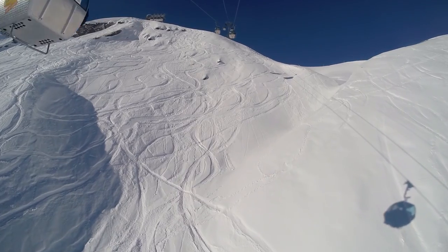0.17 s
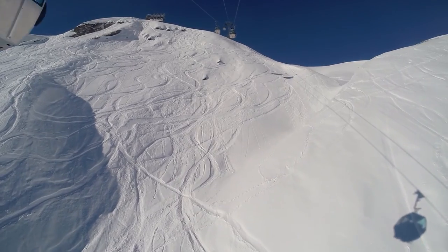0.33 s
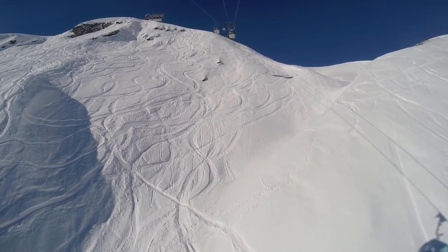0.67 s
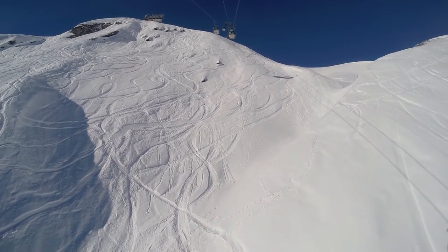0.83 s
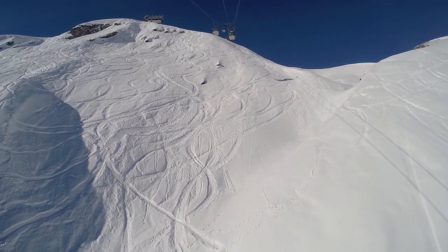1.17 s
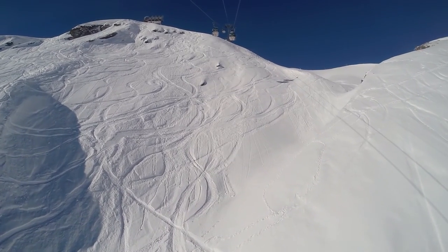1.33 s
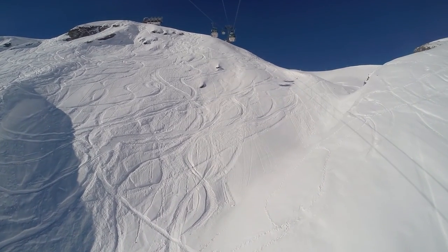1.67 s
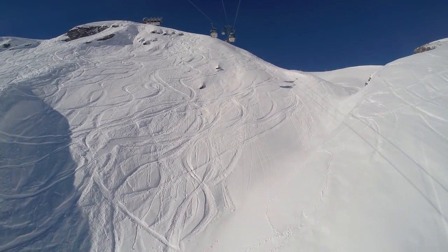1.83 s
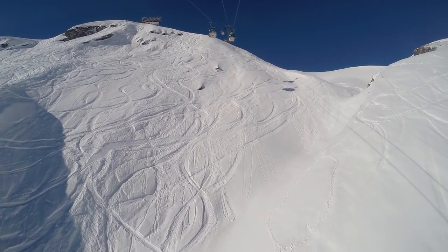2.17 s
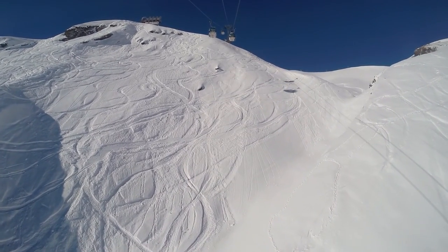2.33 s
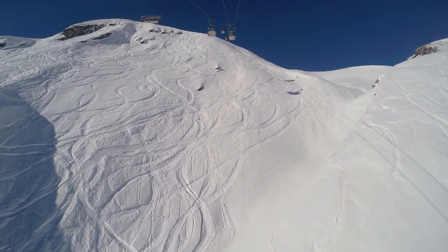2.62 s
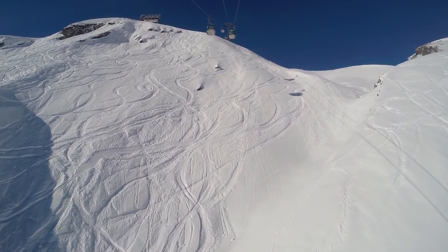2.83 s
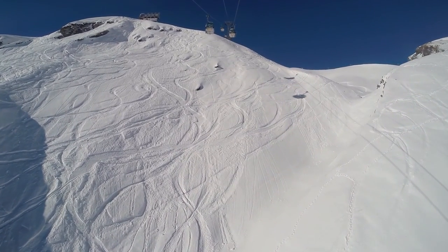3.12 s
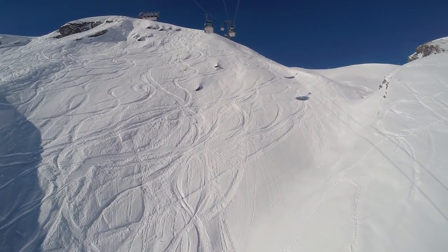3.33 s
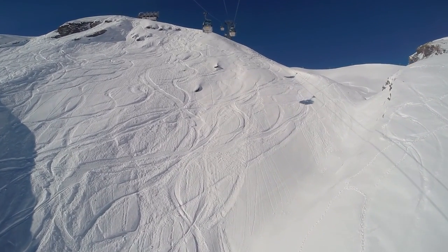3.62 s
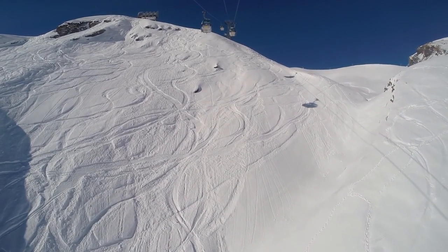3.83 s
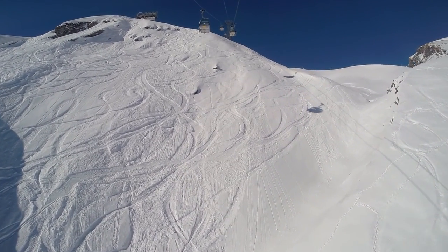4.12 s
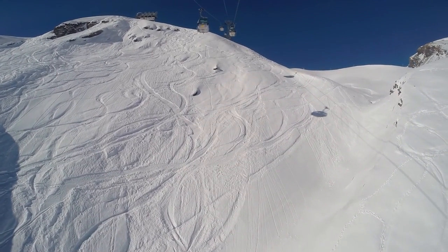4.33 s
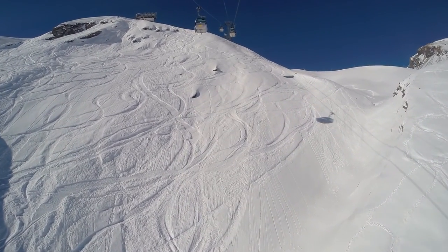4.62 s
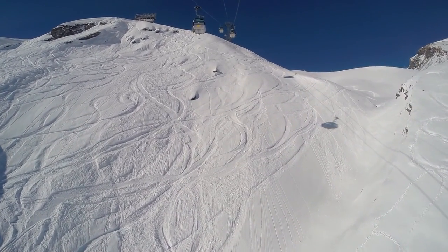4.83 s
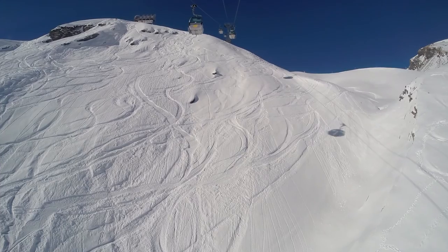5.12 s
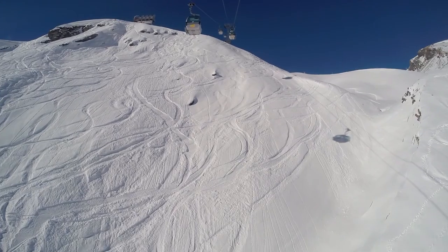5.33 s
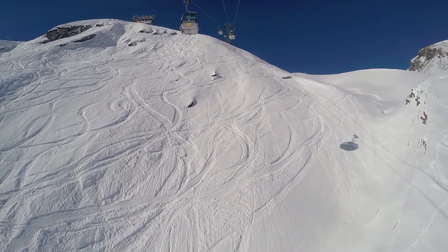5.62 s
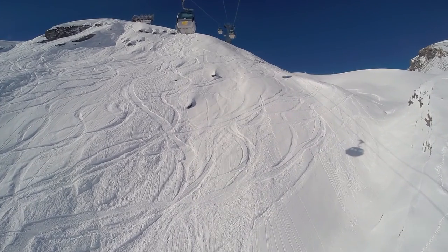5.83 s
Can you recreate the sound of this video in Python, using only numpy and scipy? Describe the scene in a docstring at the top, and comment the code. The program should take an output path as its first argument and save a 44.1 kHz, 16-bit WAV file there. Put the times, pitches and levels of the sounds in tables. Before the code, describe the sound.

A cable car cabin hums under fading wind rumble, with close jacket rustles, camera handling and a few sharp metal clicks.

```python
"""A low hum and a rumble of wind fill a cable car cabin riding uphill. The rope's twisted strands run over
the sheaves and set the shell humming; the wind gusts round the cabin and dies down. Close by, jacket cloth
rustles and fingers rub, bump and tick on a camera case. A few plastic taps and four sharp clicks of metal
gear cut through, and a faint electronic whine stays throughout."""
import sys
import numpy as np
from scipy.fft import rfft, irfft, next_fast_len
from scipy.io import wavfile
from scipy.ndimage import uniform_filter1d, map_coordinates

SR = 44100
rng = np.random.default_rng(int(sys.argv[2]) if len(sys.argv) > 2 else 0)


def log_audio(samples):
    """Write samples as a 16-bit WAV file to the path given in sys.argv[1]."""
    # one column per channel
    frames = np.atleast_2d(samples).T
    # limit to full scale, then quantise
    limited = np.clip(frames, -1, 1)
    pcm = np.round(limited * 32767).astype(np.int16)
    wavfile.write(sys.argv[1], SR, pcm)


N = 264159

# dull tone of a hand on the camera case: (frequency [Hz], relative level [dB])
HAND_SPECTRUM = [(50, -16), (100, 8), (190, 2.5), (260, -9.5), (320, -9.5), (420, -13), (600, -19.5),
                 (1200, -28.5), (2500, -43.5), (8000, -120)]
HOLLOW_HZ, HOLLOW_WIDTH_HZ = 368, 22  # the case's hollow note


def amp(db):
    """Decibels to gain."""
    return 10 ** (np.asarray(db) / 20)


def decibels(power):
    """Power to decibels."""
    return 10 * np.log10(power + 1e-12)


def unit(x):
    """Scale to rms 1."""
    return x / np.sqrt(np.mean(x ** 2) + 1e-20)


def curve(points):
    """An envelope through (time, value) points."""
    return np.interp(np.arange(N) / SR, *np.transpose(points))


def wobble(rate):
    """A smooth random curve, rate knots a second."""
    knots = rng.standard_normal(int(N * rate / SR) + 4)
    return map_coordinates(knots, [np.arange(N) * rate / SR])


def filtered(x, response):
    """x through a frequency response."""
    size = next_fast_len(len(x) + 8192)
    return irfft(rfft(x, size) * response(np.fft.rfftfreq(size, 1 / SR)), size)[:len(x)]


def coloured(x, points):
    """x shaped by (Hz, dB) points, at rms 1."""
    f, db = np.transpose(points)
    return unit(filtered(x, lambda hz: amp(np.interp(np.log(hz + 1), np.log(f), db))))


def noise(points, size=N):
    """Fresh noise with the given spectrum."""
    return coloured(rng.standard_normal(size), points)


def steadied(x, seconds):
    """Noise with its slow swells evened out."""
    power = np.abs(uniform_filter1d(x ** 2, int(seconds * SR)))
    return unit(x / np.sqrt(power + 1e-9))


def resonance(hz, width):
    """Response of one damped mode."""
    return lambda f: 1j * f * width / (hz * hz - f * f + 1j * f * width)


def ring(modes, t, scatter_db):
    """Damped modes, struck at slightly new strengths."""
    return sum(amp(db + scatter_db * rng.normal() - 60 * t / t60)
               * np.sin(2 * np.pi * (hz * t + rng.random())) for hz, db, t60 in modes)


def strokes(rows, attack_s, release_db_per_s):
    """Summed power of strokes that each rise, hold and die away."""
    power, t = np.zeros(N), np.arange(N) / SR
    for start, length, db in rows:
        attack = np.clip((t - start) / attack_s, 0, 1)
        fall_db = release_db_per_s * np.maximum(t - start - length, 0)
        power += (attack * amp(db - fall_db)) ** 2
    return power


def add(track, s, sound):
    """Mix a sound into the track at s seconds."""
    part = track[max(round(s * SR), 0):][:len(sound)]
    part += sound[:len(part)]


def whine():
    """A thin steady tone from the camera's electronics."""
    pitch_hz = 10645 + 4 * wobble(25)
    return amp(-73.5) * np.sin(2 * np.pi * np.cumsum(pitch_hz) / SR)


def wind():
    """A dying breeze with a few gusts buffets the cabin, over a steady bed of air."""
    # the breeze easing off: (time [s], level [dB])
    breeze = [(0, -20), (1.1, -20), (1.7, -18.5), (2.7, -24), (3.9, -30.5), (4.9, -29.5), (5.99, -34)]
    # gusts on top of it: (centre [s], length [s], rise [dB])
    gusts = [(.69, 0.26, 7.5), (1.413, 0.33, 9), (1.835, 0.11, 6.5), (2.134, .08, 5), (3.55, 0.3, 4.5)]
    # deep buffeting: (frequency [Hz], relative level [dB])
    rumble_spectrum = [(8, -38), (15, 4.5), (23, 1), (40, 4.5), (50, -5), (60, -15), (90, -25.5),
                       (130, -19), (250, -58.5), (1000, -120)]
    # the cabin's room tone: (frequency [Hz], relative level [dB])
    air_spectrum = [(50, -21), (100, 4), (190, 12.5), (280, -3.5), (320, -1.5), (420, -4.5), (650, -9.5),
                    (900, -12.5), (1400, -16.5), (2100, -19), (3400, -23), (5400, -26), (9000, -34.5),
                    (12500, -36), (15000, -64)]
    t = np.arange(N) / SR
    gust_db = sum(db * np.exp(-(2 * (t - s) / length) ** 2) for s, length, db in gusts)
    flurry_db = wobble(9.1)
    rumble = amp(curve(breeze) + gust_db + flurry_db) * steadied(noise(rumble_spectrum), seconds=0.108)
    air = amp(-48.5 + 0.32 * wobble(5.1)) * noise(air_spectrum)
    return rumble + air


def rustle():
    """Jacket cloth slides in a stream of tiny catches; between slides it stirs faintly and settles."""
    # cloth slides: (start [s], length [s], relative level [dB])
    slides = [(-.03, 0.071, -50.5), (.29, 0.095, -61), (.45, 0.38, -58), (.68, 0.05, -65), (.87, 0.11, -61),
              (1.13, 0.26, -61), (1.39, 0.066, -63), (1.86, 0.048, -58), (2.01, 0.028, -58.5),
              (2.2, 0.12, -70), (2.63, 0.073, -62.5), (3.38, .1, -73), (3.73, 0.12, -68),
              (5.34, 0.049, -66)]
    # the fabric's swish: (frequency [Hz], relative level [dB])
    cloth_spectrum = [(350, -7.5), (650, -2), (1000, -6), (1400, -5), (2000, -9.5), (2900, -8.5),
                      (3450, -5), (4300, -11), (5500, -8.5), (7000, -14.5), (8750, -21.5), (12500, -22),
                      (15000, -45.5)]
    stir_db = -64.5 - 1.62 * np.arange(N) / SR + wobble(11)
    cloth_db = decibels(strokes(slides, attack_s=0.025, release_db_per_s=104) + amp(stir_db) ** 2)
    catches = rng.standard_normal(N) * amp(0.9 * wobble(500) + 1.54 * wobble(40))
    return amp(cloth_db + 7.5) * coloured(catches, cloth_spectrum)


def grip():
    """Fingers shift on the camera: dull uneven friction that also sounds the hollow case."""
    # finger rubs: (start [s], length [s], relative level [dB])
    rubs = [(-.03, 0.053, -43), (.3, .05, -55), (.49, 0.29, -48), (.86, 0.13, -42.5), (1.05, .1, -51.5),
            (1.18, 0.29, -42.5), (1.64, 0.088, -49.5), (1.83, 0.053, -53.5), (2.18, .04, -51)]
    creep = (0, 2.2, -56.5)  # one long, light stroke until the hand comes to rest
    grip_db = decibels(strokes(rubs + [creep], attack_s=0.023, release_db_per_s=85))
    slips = lambda: rng.standard_normal(N) * amp(1.8 * wobble(120))
    case = resonance(HOLLOW_HZ, HOLLOW_WIDTH_HZ)
    hollow = steadied(filtered(slips(), lambda f: case(f) ** 2), seconds=0.19)
    coupling = amp(grip_db - grip_db.max()) ** 0.21  # a firmer grip drives the case more strongly
    friction = amp(grip_db + 11) * coloured(slips(), HAND_SPECTRUM)
    return friction + amp(grip_db - 2) * coupling * hollow


def bumps():
    """A soft bump thuds through the case and sounds its hollow note."""
    # bumps of the hand: (time [s], level [dB])
    hits = [(0.806, -32), (0.966, -25), (2.205, -32)]
    out, t = np.zeros(N), np.arange(SR // 4) / SR
    attack = 1 - np.exp(-t / 0.0032)
    for s, db in hits:
        thud = amp(0.5 - 60 * t / 0.097) * noise(HAND_SPECTRUM, size=len(t))
        hollow = ring([(HOLLOW_HZ, -11, .13)], t, scatter_db=3)
        add(out, s, amp(db) * attack * (thud + hollow))
    return out


def ticks():
    """The camera case gives dull little ticks under the fingers."""
    # handling ticks: (time [s], peak level [dB])
    hits = [(0.923, -31.5), (0.973, -30), (0.988, -39), (1.004, -27), (1.037, -33), (1.073, -33.5),
            (1.28, -27), (1.344, -36), (1.378, -33), (1.414, -26.5), (1.4455, -28.5)]
    # the case's modes: (frequency [Hz], relative level [dB], t60 [s])
    case_modes = [(640, -2.5, 0.0098), (950, -4.5, 0.011), (1210, -4, 0.0075), (1680, -18, 0.01)]
    out, t = np.zeros(N), np.arange(SR // 10) / SR
    attack = 1 - np.exp(-t / 0.0006)
    for s, db in hits:
        tick = attack * ring(case_modes, t, scatter_db=3.5)
        add(out, s, amp(db) * tick / np.abs(tick).max())
    return out


def taps():
    """Light plastic contacts, each with a short ring, die away quickly in the small cabin."""
    # plastic taps: (time [s], relative level [dB], ring pitch [Hz], ring against clack [dB])
    hits = [(0.742, -34, 2450, -12), (1.155, -29.5, 2750, -11), (1.228, -35, 2700, -8),
            (1.305, -23.5, 2750, -4.5), (1.362, -28, 2350, -10), (1.432, -40, 2600, -2),
            (1.699, -43, 2500, -10), (2.654, -41, 2400, 5), (4.648, -49.5, 3200, 7)]
    # the clack of plastic: (frequency [Hz], relative level [dB])
    plastic_spectrum = [(400, 1), (1400, 1), (1900, -4.5), (2500, -1.5), (3200, -2.5), (4200, -10),
                        (6000, -23), (10000, -59)]
    out, t = np.zeros(N), np.arange(SR // 5) / SR
    attack = 1 - np.exp(-t / 0.0007)  # plastic meets softly
    envelope = attack * amp(-7 - 60 * t / 0.063)
    for s, db, ring_hz, ring_db in hits:
        note = unit(filtered(rng.standard_normal(len(t)), resonance(ring_hz, width=200)))
        clack = noise(plastic_spectrum, size=len(t))
        add(out, s, amp(db) * envelope * (clack + amp(ring_db) * note))
    return out


def clicks():
    """Metal snaps on metal, rings and rebounds; the close walls smear the crack."""
    # metal clicks, levels relative:
    # (time [s], level [dB], rebound delay [s], rebound [dB], ping [dB], knock [dB], treble [dB])
    hits = [(0.1418, -21.5, .0045, -11, -9, -16, -10), (0.855, -19.5, .0052, -3, -5, -13, -2),
            (2.5832, -18.5, .0045, -6, -2, -5, -2), (3.3375, -20.5, .005, -1, 2.5, -17, 2)]
    # the bright edge of a click: (frequency [Hz], relative level [dB])
    crack_spectrum = [(800, -41), (1250, 5), (2100, -12.5), (3300, 3), (4250, -3.5), (5200, -16),
                      (6500, -1.5), (8000, -16), (9500, -23.5), (13000, -28)]
    # its dull body: (frequency [Hz], relative level [dB])
    knock_spectrum = [(800, -72), (1250, 2), (1500, 7), (2000, -10.5), (3000, 9), (6000, -54)]
    # the metal's modes: (frequency [Hz], relative level [dB], t60 [s])
    metal_modes = [(1280, -4.5, 0.046), (1385, -8.5, 0.038), (1930, -14, 0.076), (2570, -11.5, 0.12),
                   (3020, -18, .08), (3345, 1.5, 0.11), (3370, 0.5, 0.036), (3310, -26, 0.045),
                   (4210, -6.5, 0.038), (6900, -15, 0.15), (6940, -30, 0.095)]
    out, t = np.zeros(N), np.arange(SR // 4) / SR
    snap = amp(-12.5 - 60 * t / 0.012)
    wall_tail = amp(-18.5 - 60 * t / 0.12)
    for s, db, delay, rebound_db, ping_db, knock_db, treble_db in hits:
        # a harder contact is brighter
        hardness = lambda f: amp(treble_db * np.clip(np.log2((f + 1) / 4000), 0, 1))
        for late, level_db in [(0, db), (delay, db + rebound_db)]:
            crack = filtered(noise(crack_spectrum, size=len(t)), hardness)
            knock = amp(knock_db) * noise(knock_spectrum, size=len(t))
            metal = amp(-18) * ring(metal_modes, t, scatter_db=3.5)
            add(out, s + late, amp(level_db) * ((crack + knock) * (snap + wall_tail) + metal))
        ping = ring([(6178, 0, .12)], t, scatter_db=.5)  # the metal's purest mode
        add(out, s, amp(db + ping_db - 15) * ping)
    return out


def rope_hum():
    """The strands shake the hanger at multiples of one rate; the shell booms more as the drone swells."""
    # hum partials: (harmonic [multiple of the strand rate], level [dB])
    harmonics = [(5, -41.5), (6, -41.5), (7, -55), (11, -41), (13, -47.5), (17, -46), (18, -55), (19, -53),
                 (23, -64)]
    # the drone, harmonic 12, the hum's loudest note, just above the shell's boom: (time [s], level [dB])
    drone_swells = [(0.08, -25), (0.24, -33), (1.35, -22.5), (1.81, -28), (2.14, -24), (3.56, -35.5),
                    (3.58, -35.5), (4.44, -33), (4.56, -51), (4.69, -32.5), (5.56, -24.5), (5.95, -28)]
    # shell resonances: (frequency [Hz], width [Hz], relative level [dB])
    shell_modes = [(129, 12, -11), (139, 8.7, -2.5), (226, 8.5, -21)]
    strands_per_s, t = 12.3, np.arange(N) / SR
    cycles = np.cumsum(strands_per_s * (1 + .002 * wobble(3))) / SR
    partial = lambda order: np.sqrt(2) * np.sin(2 * np.pi * (order * cycles + rng.random()))
    flutter = lambda: amp(1.5 * wobble(4))
    hum = sum(amp(db) * flutter() * partial(order) for order, db in harmonics)
    drone_db = curve(drone_swells)
    drone = amp(drone_db - 0.46) * partial(order=12)
    note_db = -28 - 16 * np.maximum(t - 0.6, 0)  # a low shell note holds, then dies away
    note_hz = 130.3 + 0.68 * wobble(4.64)
    shell_note = amp(note_db) * np.sqrt(2) * np.sin(2 * np.pi * np.cumsum(note_hz) / SR)
    shell = lambda f: sum(amp(db) / (1 + ((f - hz) / width * 2) ** 2) for hz, width, db in shell_modes)
    boom_db = -36 + 0.23 * (drone_db - drone_db.mean())
    boom = amp(boom_db) * steadied(filtered(rng.standard_normal(N), shell), seconds=.2)
    return hum + drone + shell_note + boom


def scene():
    """Everything heard from one seat, in mono."""
    mix = rope_hum() + wind() + grip() + bumps() + rustle() + clicks() + taps() + ticks() + whine()
    return mix[None]


def record(dry):
    """A steep low-pass takes off the highest treble."""
    cutoff_hz = 13700
    return np.array([filtered(x, lambda hz: 1 / np.sqrt(1 + (hz / cutoff_hz) ** 48)) for x in dry])


dry = scene()
out = record(dry)
log_audio(out)
```